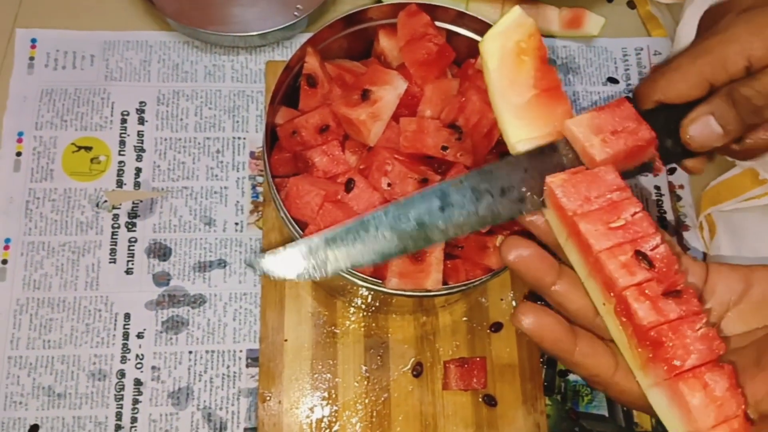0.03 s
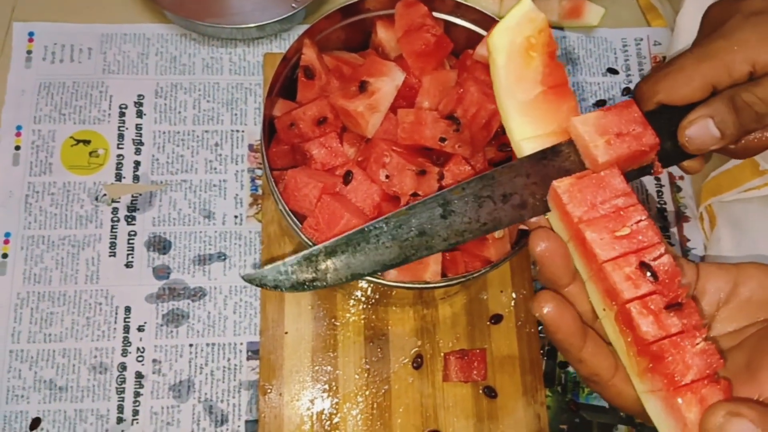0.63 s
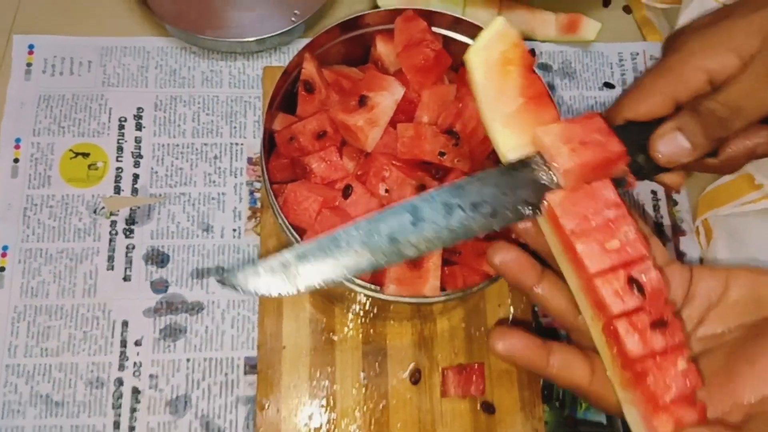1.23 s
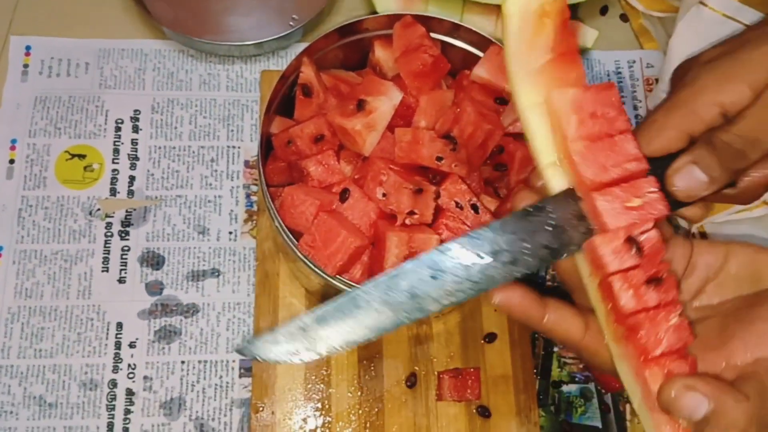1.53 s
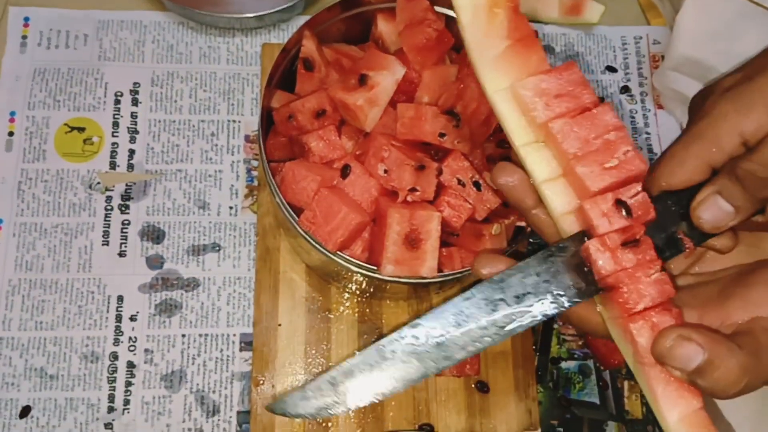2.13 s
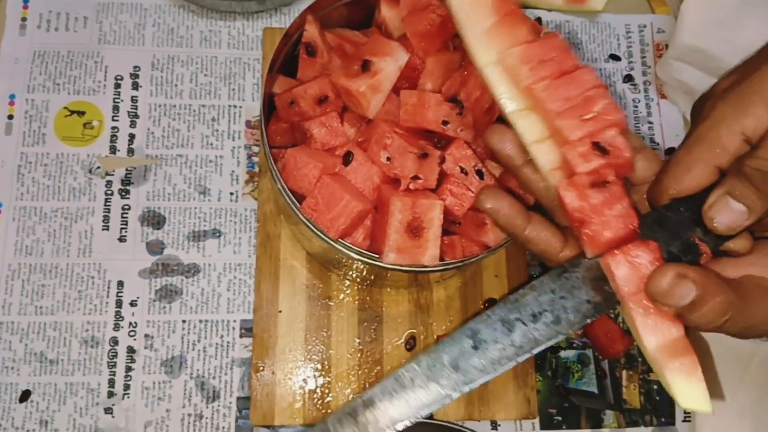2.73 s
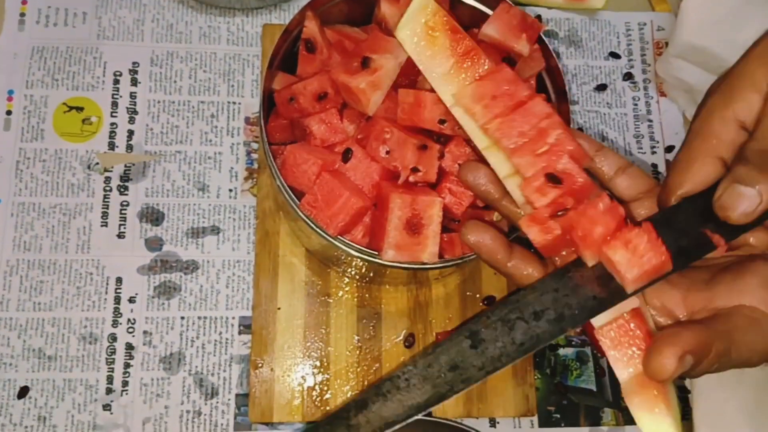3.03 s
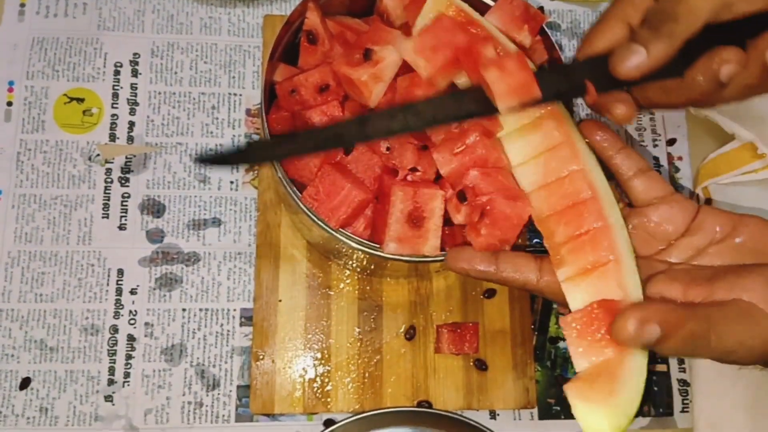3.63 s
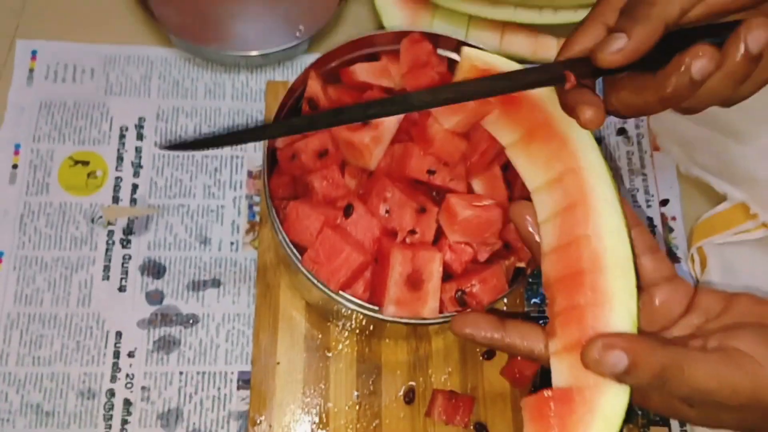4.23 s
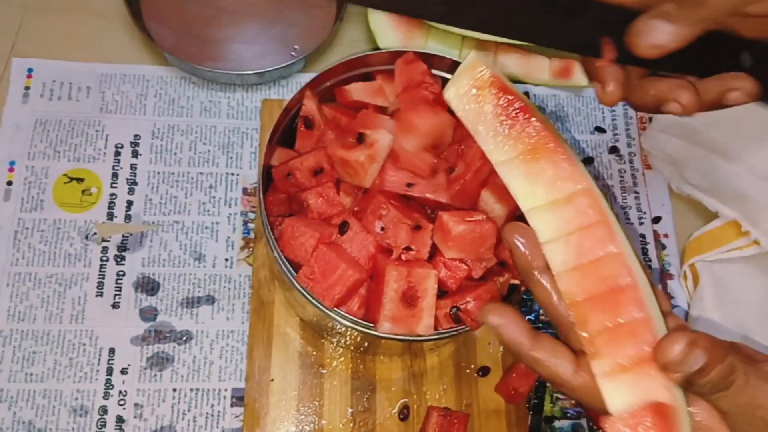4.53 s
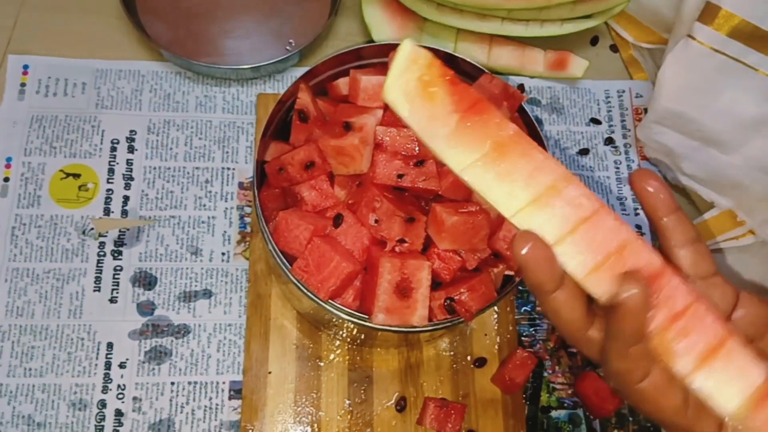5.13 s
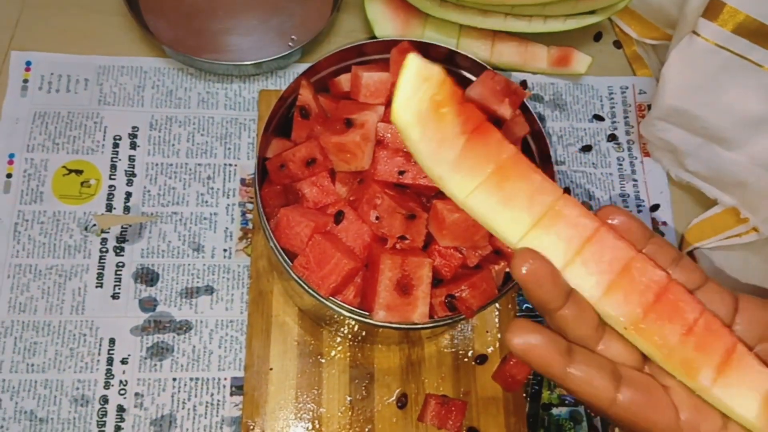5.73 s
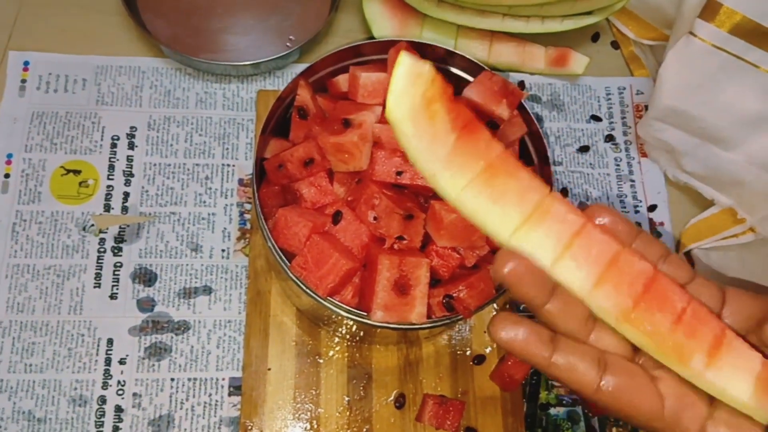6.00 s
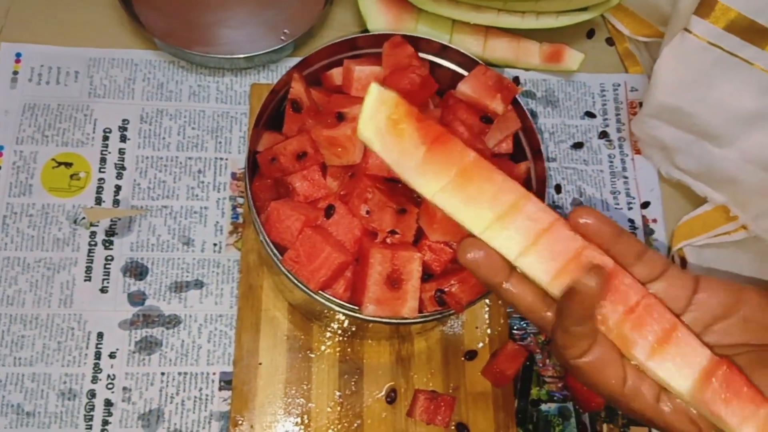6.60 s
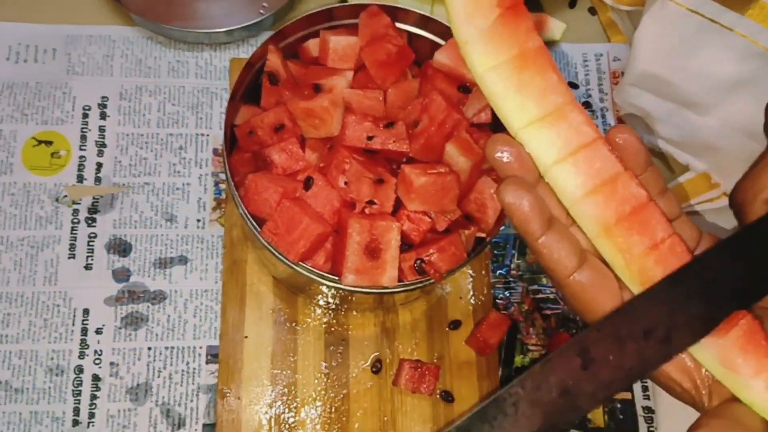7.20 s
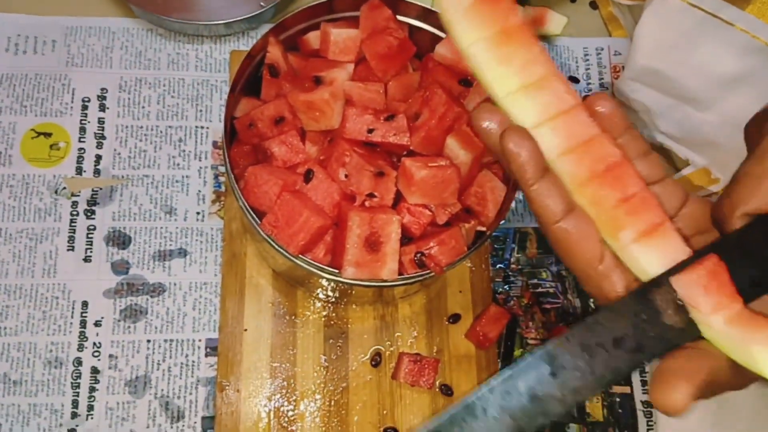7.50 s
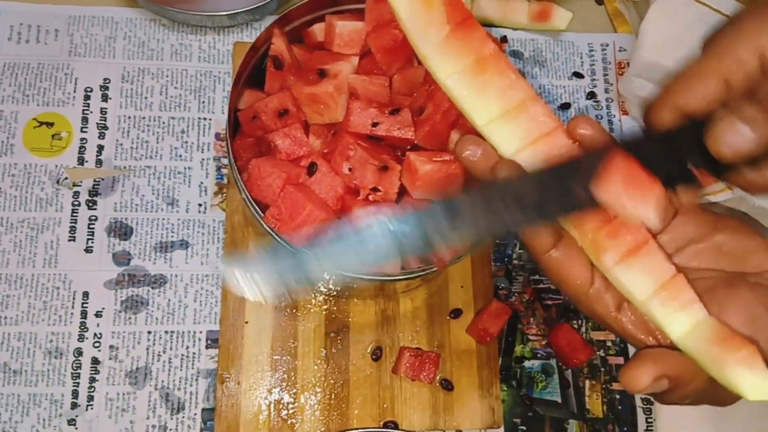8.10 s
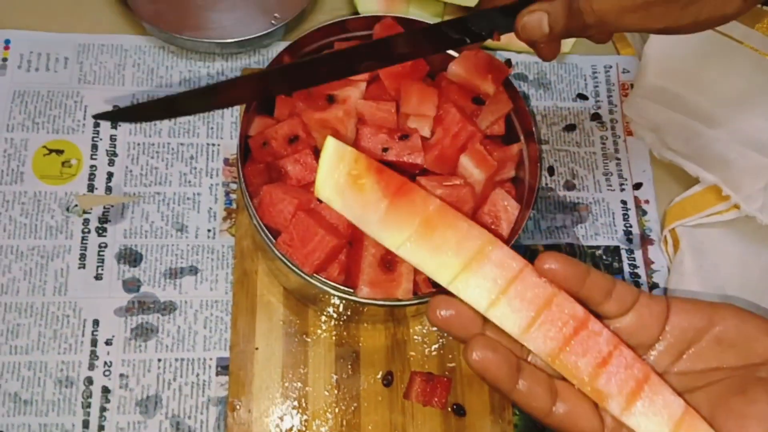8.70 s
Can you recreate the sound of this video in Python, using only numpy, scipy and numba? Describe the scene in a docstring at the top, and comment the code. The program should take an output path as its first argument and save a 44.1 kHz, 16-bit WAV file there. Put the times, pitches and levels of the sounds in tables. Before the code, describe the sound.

A large knife slices juicy watermelon off the rind in short, wet, crunchy strokes, with small pops and light taps.

```python
"""Knife cutting watermelon into a steel bowl

A large knife shaves cubes off a hand-held rind, close to a phone's left microphone port. Each stroke
bursts thousands of juicy cells: a fizz, a crunch and, deep in the cut, a hollow rasp. Wet flesh pops,
the blade rubs, taps and sings faintly, cubes drop with soft thuds. Small quiet room, electrical whine."""
import sys
import numpy as np
from scipy import signal
from scipy.fft import rfft, irfft
from scipy.io import wavfile
from scipy.ndimage import uniform_filter1d, map_coordinates
from numba import njit

SR = 44100
rng = np.random.default_rng(int(sys.argv[2]) if len(sys.argv) > 2 else 0)


def log_audio(samples):
    """Write samples as a 16-bit WAV file to the path given in sys.argv[1]."""
    # one column per channel
    frames = np.atleast_2d(samples).T
    # limit to full scale, then quantise
    limited = np.clip(frames, -1, 1)
    pcm = np.round(limited * 32767).astype(np.int16)
    wavfile.write(sys.argv[1], SR, pcm)


N = 385875
TIME = np.arange(N) / SR


# knife strokes: start_s, push_s, fizz_db, crunch_db, rasp_db, fade_db_per_s, pocket_hz, upper_pocket_db
STROKES = [(0.922, 0.24, -48, -52, -82, 230, 3700, 9.5), (1.226, 0.12, -49, -54.5, -85.5, 147.5, 3410, 3.5),
           (1.397, 0.14, -37, -36, -52, 129, 2960, -3), (1.715, 0.18, -40, -42, -58.5, 112, 2920, -11),
           (1.991, 0.15, -45, -49.5, -76, 160, 3010, -10), (2.198, 0.13, -42.5, -48.5, -68, 87, 3030, -3.5),
           (2.303, 0.13, -41, -45, -61.5, 295, 2940, -2.5),
           (2.583, 0.07, -40, -41.5, -62.5, 199, 3000, -8.5),
           (5.614, 0.077, -47.5, -66, -79, 150, 3120, 10), (5.692, 0.087, -42.5, -51, -77, 168.5, 3050, -8),
           (5.817, 0.083, -34.5, -38, -56.5, 210, 2950, -6.5),
           (7.258, 0.025, -38.5, -45, -68.5, 172, 3270, -0.5),
           (7.283, 0.13, -36, -37, -53.5, 161.5, 2980, -11)]

def slicing():
    """The edge sticks and slips through the flesh; every slip bursts more cells."""
    _, _, fizz_db, crunch_db, rasp_db, *_ = np.transpose(STROKES)
    slip = undb(0.23 * walk(size=110) + 1.6 * walk(size=400))
    fizz = juice_fizz(slip) * stroke_gain(fizz_db, swell_db=15, bend=3.5, lag_s=0.001)
    crunch = flesh_crunch(slip) * stroke_gain(crunch_db, swell_db=19.8, bend=2.63, lag_s=0.003)
    rasp = hollow_rasp(slip) * stroke_gain(rasp_db, swell_db=47, bend=4.44, lag_s=0.014)
    return undb(2) * fizz + undb(1.5) * crunch + undb(7.5) * rasp


def stroke_gain(peaks_db, swell_db, bend, lag_s):
    """The edge bites, the sound swells with depth (bend > 1: early), drops as the push ends, fades."""
    bite_db_per_s, let_go_db, let_go_s = 699.5, 7, 0.031
    db = np.full(N, -200.)
    for (start_s, push_s, _, _, _, fade_db_per_s, _, _), peak_db in zip(STROKES, peaks_db):
        age = TIME - lag_s - start_s
        depth = np.clip(age / push_s, 0, 1)
        before, after = np.maximum(-age, 0), np.maximum(age - push_s, 0)
        attack_db = bite_db_per_s * before + swell_db * (1 - depth) ** bend
        release_db = let_go_db * np.minimum(after / let_go_s, 1) + fade_db_per_s * after
        db = np.maximum(db, peak_db - attack_db - release_db)
    return undb(db)


# juice spectrum: freq_hz, gain_db
FIZZ_EQ = [(6000, -24), (8300, -20), (9200, -16.5), (9900, -6), (10600, 3), (12400, -0.5), (13600, -3.5),
           (15000, -13), (16000, -11.5)]

def juice_fizz(slip):
    """Juicy cells burst in a dense treble spray."""
    spray = cells(8700, 16500, cycles=16.8, spread_db=2, count=30000, size=40)
    return even(slip * colour(spray, FIZZ_EQ), size=1200)


# tearing flesh spectrum: freq_hz, gain_db
CRUNCH_EQ = [(1400, -18), (1850, -20), (2250, 9.5), (2600, 0.5), (3100, -3), (3900, 5), (5000, -4.5),
             (6000, -2.5), (7200, -5), (8400, -18.5), (11000, -11.5)]
# blade resonances: pitch_hz, width_hz, gain_db
BLADE_MODES = [(2402, 12, 0.5), (2430, 26, -8.5), (3086, 12, 16), (3320, 230, -7), (4620, 61, -2),
               (5120, 91, 3.5), (6000, 23, -24), (7860, 220, -10.5)]

def flesh_crunch(slip):
    """Tearing cells ring the air pockets, the wet slit beside the blade and the blade itself."""
    tearing = slip * cells(1640, 9100, cycles=13.2, spread_db=1, count=20000, size=140)
    pockets, slit = cavities(tearing)
    flesh, pockets, slit = (unit(colour(x, CRUNCH_EQ)) for x in (tearing, pockets, slit))
    blade = unit(ring(flesh, BLADE_MODES))
    return even(flesh + undb(6) * pockets + undb(-8) * slit + undb(-1.5) * blade, size=1200)


def cavities(tearing):
    """Air pockets and slit widen over each push: the sound gets lower and duller."""
    sag, dulling_db = 0.11, 14.5
    start_s, push_s, *_, pocket_hz, upper_pocket_db = np.transpose(STROKES)
    now = latest(start_s)
    opening = np.clip((TIME - start_s[now]) / push_s[now] - 1, -1, 0.3)  # -1 at push start, 0 at its end
    lower_hz = pocket_hz[now] * np.exp(-sag * opening)
    tilt_db = upper_pocket_db[now] - dulling_db * opening
    wobble = np.exp(0.036 * walk(size=2200))  # juice fills and leaves the pockets
    lower = sweep(tearing, lower_hz * wobble, width_hz=250) * undb(-tilt_db / 2)
    upper = sweep(tearing, 4950 * wobble, width_hz=600) * undb(tilt_db / 2)
    drifting_hz = lower_hz * np.exp(0.014 * walk(size=3000))
    slit_high = sweep(tearing, 1.1 * drifting_hz, width_hz=120)
    slit_low = sweep(tearing, 0.73 * drifting_hz, width_hz=120)
    return lower + upper, slit_high + undb(-12.5) * slit_low


# deep cut spectrum: freq_hz, gain_db
RASP_EQ = [(600, -58), (1050, -33.5), (1300, -16.5), (1500, -11.5), (1750, -8.5), (2000, 2), (2300, -4),
           (2900, -27)]

def hollow_rasp(slip):
    """Cells bursting deep in the cut sound low and hollow."""
    deep_cells = cells(1215, 2760, cycles=14, spread_db=-4, count=7000, size=320)
    return even(slip * colour(deep_cells, RASP_EQ), size=1200)


# snapping juice films and cell walls: start_s, fizz_db, crunch_db, length_s
POPS = [(0.026, -45, -43.5, 0.0027), (0.296, -73, -70, 0.004), (0.565, -72, -59, 0.007),
        (0.83, -58, -63, 0.009), (0.859, -54, -50, 0.0012), (0.887, -58, -62, 0.0011),
        (0.905, -50.5, -53.5, 0.00086), (0.932, -49.5, -46, 0.01), (1.029, -48, -42, 0.002),
        (1.295, -45.5, -42, 0.0083), (1.493, -35, -41, 0.002), (1.531, -41, -35, 0.0048),
        (1.7, -53, -62, 0.0036), (1.86, -40.5, -48, 0.0051), (1.966, -49, -50, 0.0089),
        (2.147, -42.5, -65, 0.0066), (2.485, -53, -51, 0.0039), (2.552, -48, -50.5, 0.012),
        (2.805, -51.5, -70.5, 0.0028), (5.395, -47.5, -61, 0.0034), (5.442, -56, -84, 0.0019),
        (5.45, -45, -60, 0.0061), (5.61, -53.5, -70, 0.0044), (5.709, -43, -52, 0.005),
        (6.057, -57, -72, 0.004), (6.086, -48.5, -58, 0.004), (6.142, -53, -58.5, 0.0021),
        (6.269, -60, -70, 0.0045), (6.414, -69, -49, 0.008), (6.533, -57, -56, 0.0057),
        (6.895, -41, -39.5, 0.015), (6.98, -53, -60, 0.0036), (7.025, -50, -62, 0.004),
        (7.039, -55, -66, 0.0016), (7.197, -49, -50, 0.0074), (7.25, -51.5, -58, 0.004),
        (7.384, -36, -28, 0.0079), (7.623, -49, -60, 0.0075), (7.671, -48, -50, 0.0052),
        (7.683, -53.5, -46, 0.0052), (7.928, -44, -45, 0.01), (8.709, -61, -49, 0.0096)]
# snap spectrum: freq_hz, gain_db
SNAP_EQ = [(1500, -37.5), (2300, 1), (3100, -3), (4200, 0.5), (5200, 3.5), (6200, -4), (7300, -14.5),
           (8600, -19.5), (11000, -31)]

def popping():
    """Wet faces part in a flurry of tiny bursts; a faint crackle just precedes and trails each snap."""
    start_s, fizz_db, crunch_db, length_s = np.transpose(POPS)
    fizz = colour(cells(11000, 15000, cycles=2.9, spread_db=9.5, count=36000, size=36), FIZZ_EQ)
    crunch = colour(cells(2500, 7700, cycles=21, spread_db=-1, count=26000, size=100), SNAP_EQ)
    snap_fizz, snap_crunch = (bursts(start_s, db, 1.24 * length_s, rise=0.4)
                              for db in (fizz_db, crunch_db))
    halo_fizz, halo_crunch = (bursts(start_s - 0.005, db - 13, length_s + 0.011, rise=1)
                              for db in (fizz_db, crunch_db))
    seep = bursts(start_s, fizz_db - 13.5, lengths_s=0.03, rise=0.12)  # juice fizzes on after a snap
    flicker = unit(undb(5.9 * walk(size=70)))
    fizz = even(fizz, size=130) * np.hypot(snap_fizz, flicker * np.hypot(halo_fizz, seep))
    crunch = even(crunch, size=130) * np.hypot(snap_crunch, flicker * halo_crunch)
    return undb(4) * fizz + undb(-8) * crunch


# blade knocks on rind, seeds and bowl: start_s, treble_db, body_db, length_s, ring_hz, ring_db
TAPS = [(2.962, -54, -69, 0.02, 2310, -52.5), (3.872, -57, -49, 0.012, 3420, -53),
        (3.942, -49.5, -42.5, 0.009, 2580, -52), (4.024, -68, -54, 0.0017, 5270, -51),
        (4.043, -49, -49, 0.006, 4440, -40.5), (4.053, -44, -48, 0.001, 2450, -42),
        (4.198, -58, -57.5, 0.011, 4740, -69), (4.305, -69.5, -72, 0.0066, 5300, -86),
        (4.533, -80, -61, .005, 3540, -62), (4.841, -72, -64, 0.0035, 5870, -59),
        (5.295, -67.5, -61, 0.0047, 4990, -66), (6.842, -74, -70.5, 0.0047, 3280, -55),
        (8.353, -86, -63, 0.003, 3490, -48)]

def tapping():
    """A sharp contact rings the damped blade and, at its own pitch, the wet spot that was struck."""
    start_s, treble_db, body_db, length_s, ring_hz, ring_db = np.transpose(TAPS)
    tick = even(colour(noise(), FIZZ_EQ), size=130)
    tick *= bursts(start_s, treble_db, 0.59 * length_s, rise=0.72)
    crack = contact_crack(start_s, body_db, length_s)
    spot = even(sweep(noise(), ring_hz[latest(start_s)], width_hz=79), size=400)
    spot *= bursts(start_s, ring_db, lengths_s=0.012, rise=0.037)
    return undb(5.5) * tick + ring(crack, BLADE_MODES) + undb(-4.5) * (crack + spot)


# hard contact spectrum: freq_hz, gain_db
CRACK_EQ = [(900, -84), (1800, 10.5), (2500, 12), (4000, 7.5), (5500, 19), (7500, 8), (9500, 9.5),
            (14000, -70)]

def contact_crack(start_s, level_db, length_s):
    """Each knock gives a broad, fast-rising burst of noise."""
    crack = even(colour(noise(), CRACK_EQ), size=130)
    return crack * bursts(start_s, level_db, 1.02 * length_s, rise=0.16)


# blade and fingers on the rind: start_s, length_s, fizz_db, crunch_db
RUBS = [(0.0, 0.011, -56, -57), (0.803, 0.11, -63, -66), (2.845, 0.035, -63, -74),
        (3.022, 0.079, -70.5, -80), (3.18, 0.16, -62.5, -77), (3.417, 0.067, -69.5, -74.5),
        (3.517, 0.069, -63, -64), (3.63, 0.084, -79.5, -80), (3.892, 0.24, -65, -69.5),
        (4.114, 0.16, -70.5, -75), (4.432, 0.15, -77.5, -91), (4.681, 0.053, -70, -73.5),
        (6.065, 0.057, -61, -73), (6.384, 0.18, -71, -68), (6.956, 0.039, -53.5, -69.5),
        (7.632, 0.034, -49.5, -65), (8.691, 0.04, -59.5, -70)]

def rubbing():
    """Light contact on wet rind: small crackles, random tiny snaps and the blade's thin top ring."""
    snaps_per_s, snap_db, snap_spread_db = 50, -6, 9
    fizz = even(colour(cells(8000, 17000, cycles=3.3, spread_db=1, count=6000, size=48), FIZZ_EQ), 2000)
    crunch = even(cells(2800, 6480, cycles=17, spread_db=-6, count=7000, size=140), size=2000)
    snaps = rng.random(N) < snaps_per_s / SR
    levels_db = snap_db + snap_spread_db * rng.uniform(-1, 1, N)[snaps]
    fizz *= np.hypot(1, bursts(TIME[snaps], levels_db, lengths_s=0.006, rise=0.43))
    fizz += undb(-7.5) * unit(ring(fizz, [(10400, 100, 0)]))
    out = 0
    for start_s, length_s, fizz_db, crunch_db in RUBS:
        contact = hold(start_s, length_s, attack_s=0.018, release_s=0.009)
        out += contact * (undb(fizz_db) * fizz + undb(crunch_db) * crunch)
    return out


# blade drags: start_s, length_s, level_db, pitch_hz, width_hz, rustle_rel_db
DRAGS = [(2.977, 0.515, -71, 2675, 70, -26), (3.557, 0.62, -73, 2700, 70, -29),
         (6.298, 0.32, -79, 2670, 300, -16), (3.506, 0.11, -75, 4750, 450, -9),
         (3.964, 0.21, -71, 4780, 440, -12), (6.34, 0.28, -70.5, 4790, 300, -13)]

def singing():
    """Friction on the wet rind keeps a narrow resonance faintly, unevenly alive in a broader rustle."""
    rustle = unit(ring(colour(noise(), SNAP_EQ), [(5070, 1500, -2), (3000, 430, -1)]))
    friction, out = noise(), 0
    for start_s, length_s, level_db, pitch_hz, width_hz, rustle_rel_db in DRAGS:
        mode = [(pitch_hz, width_hz, 0)]
        tone = even(ring(ring(friction, mode), mode), size=3000)
        contact = hold(start_s, length_s, attack_s=0.042, release_s=0.051)
        out += undb(level_db) * contact * (undb(3.5) * tone + undb(rustle_rel_db) * rustle)
    flutter_db = walk(size=1500)
    return out * undb(flutter_db)


# soft impacts of flesh and hands: start_s, level_db, length_s, pitch_hz, bowl_rel_db
THUDS = [(0.716, -63.5, 0.025, 128, -11), (0.85, -63.5, 0.07, 65, -27), (0.923, -71, 0.059, 65, -2.5),
         (1.12, -65, 0.043, 70, -31), (1.223, -63.5, 0.065, 65, -16), (2.781, -69, 0.02, 103.5, -33.5),
         (3.414, -58.5, 0.023, 125.4, -23), (5.141, -65, 0.055, 78.7, -11), (5.26, -60.5, 0.021, 74.3, -15),
         (7.29, -63.5, 0.03, 139, -23), (7.762, -54, 0.023, 117, -20), (7.788, -51, 0.016, 69.4, -9),
         (7.818, -52.5, 0.033, 112, -26)]
# full bowl resonances: pitch_hz, width_hz, gain_db
BOWL_MODES = [(396, 360, -1), (780, 140, 2.5), (1223, 130, -4), (1570, 400, -3.5)]

def thudding():
    """Soft low thuds shake the board, each with its own pitch and its own amount of bowl knock."""
    start_s, level_db, length_s, pitch_hz, bowl_rel_db = np.transpose(THUDS)
    energy_db = level_db + 10 * np.log10(length_s / 0.01)
    board_hz = np.interp(TIME, start_s + length_s / 2, pitch_hz)
    board = even(sweep(sweep(noise(), board_hz, width_hz=44), board_hz, width_hz=44), size=900)
    board *= bursts(start_s, energy_db, 0.86 * length_s, rise=0.84)
    bowl = even(ring(ring(noise(), BOWL_MODES), BOWL_MODES), size=700)
    bowl *= bursts(start_s, energy_db + bowl_rel_db, 1.7 * length_s, rise=0.25)
    return board + bowl


# shading of the far port: freq_hz, gain_db
FAR_PORT_EQ = [(100, -3), (1000, 3.5), (2200, -1), (3500, 0), (5000, -1.5), (7000, 2.5), (8500, 8.5),
               (9400, -3.5), (10600, -19.5), (12500, -9.5), (14000, -13), (16000, -22)]

def ports(x):
    """The near port hears mostly the blade itself, the shaded far port more of the room."""
    near = x + undb(-9.5) * reflections(x)
    lag_samples = 2 + 5.2 * walk(size=500)  # cells burst all along the blade
    shaded = map_coordinates(x, [np.arange(N) - lag_samples], order=3)
    detour_samples = 70 + 22 * walk(size=900)  # by way of board, bowl and hands
    scattered = map_coordinates(x, [np.arange(N) - detour_samples], order=3)
    far = undb(-14) * shaded + undb(-6.5) * (scattered + reflections(x))
    return np.array([near, colour(far, FAR_PORT_EQ)])


def reflections(x, t60_s=0.17):
    """Dense, quickly dying echoes of a small room."""
    age = TIME[:SR // 2]
    tail = rng.standard_normal(len(age)) * undb(-60 * age / t60_s) * (1 - np.exp(-age / 0.001))
    return signal.fftconvolve(x, tail / np.linalg.norm(tail))[:N]


# room air spectrum: freq_hz, gain_db
AIR_EQ = [(20, -23), (40, -18.5), (62, -4.5), (90, -6), (135, 3.5), (200, -9), (290, -4), (600, -13.5),
          (900, -13), (1400, -17), (2800, -17.5), (4500, -31.5), (8000, -39), (16000, -35.5)]

def room_air():
    """Faint rumble and hiss, mostly alike at both ports from 70 to 500 Hz."""
    side_eq = [(30, 5.5), (70, -11), (130, -8.5), (250, -7.5), (500, -7.5), (1000, 1.5), (4000, 1)]
    mid = colour(noise(), AIR_EQ)
    side = colour(colour(noise(), AIR_EQ), side_eq)
    return np.array([mid + side, mid - side]) / np.std(mid) * undb(-70.5 + 0.22 * walk(size=9000))


def electrical_whine(pitch_hz=3807):
    """A thin, slightly wavering tone, louder at the far port."""
    phase = 2 * np.pi * np.cumsum(pitch_hz + walk(size=3000)) / SR
    near_db, far_db = -83 + 4 * walk(size=20000), -75 + 1.2 * walk(size=6000)
    return np.sqrt(2) * np.sin(phase) * undb([near_db, far_db])


def cells(low_hz, high_hz, cycles, spread_db, count, size):
    """Random bursting cells, each dying 60 dB over `cycles`; spread_db > 0 makes a few much louder."""
    when, pitch, luck = rng.random((count, 3)).T
    hz = (low_hz + pitch * (high_hz - low_hz))[:, None]
    turns = hz * np.arange(size) / SR
    strength = undb(-spread_db * np.log(np.maximum(luck, 0.01)))[:, None] * hz
    grains = strength * np.sin(2 * np.pi * turns) * undb(-60 * turns / cycles)
    places = (when * N).astype(int)[:, None] + np.arange(size)
    return np.bincount(places.ravel(), grains.ravel(), N + size)[:N]


def bursts(starts_s, levels_db, lengths_s, rise):
    """Envelope of quick swells that die away; a level is the burst's energy spread over 10 ms."""
    power = np.zeros(N)
    for start_s, db, length_s in np.broadcast(starts_s, levels_db, np.maximum(lengths_s, 0.001)):
        first = int(start_s * SR)
        age = np.arange(min(int(10 * length_s * SR), N - first)) / SR / length_s
        shape = (1 - np.exp(-age / rise)) ** 2 * np.exp(-2 * age)
        power[first:first + len(age)] += undb(db) ** 2 * shape / (shape.sum() + 1e-9) * SR / 100
    return np.sqrt(power)


def hold(start_s, length_s, attack_s, release_s):
    """Envelope that rises, holds through a contact and dies away."""
    age = TIME - start_s
    return np.clip(age / attack_s, 0, 1) * np.exp(-np.clip((age - length_s) / release_s, 0, 20))


def latest(starts_s):
    """Index of the most recent event at each sample."""
    return np.maximum(np.searchsorted(starts_s, TIME) - 1, 0)


def colour(x, points):
    """Minimum-phase filter through (freq_hz, gain_db) points."""
    hz, db = np.transpose(points)
    grid_hz = np.maximum(np.fft.rfftfreq(4096, 1 / SR), 1)
    cepstrum = irfft(np.log(undb(np.interp(np.log(grid_hz), np.log(hz), db))))
    half = len(cepstrum) // 2
    cepstrum[1:half] *= 2
    cepstrum[half + 1:] = 0
    return signal.fftconvolve(x, irfft(np.exp(rfft(cepstrum))))[:N]


def ring(x, modes):
    """Drive parallel (pitch_hz, width_hz, gain_db) resonances."""
    return sum(undb(db) * signal.lfilter(*signal.iirpeak(hz, hz / width_hz, fs=SR), x)
               for hz, width_hz, db in modes)


@njit
def sweep(x, hz, width_hz):
    """Resonance with a moving centre, gain 1 there."""
    y, band, low = np.empty(len(x)), 0., 0.
    for i in range(len(x)):
        g, damping = np.tan(np.pi * hz[i] / SR), width_hz / hz[i]
        v = (band + g * (x[i] - low)) / (1 + g * (g + damping))
        band, low = 2 * v - band, low + 2 * g * v
        y[i] = damping * v
    return y


def noise():
    """White noise."""
    return rng.standard_normal(N)


def walk(size):
    """Random levels held for size samples and slewed; rms 1."""
    steps = np.repeat(rng.standard_normal(N // size + 1), size)
    return unit(uniform_filter1d(steps, size)[:N])


def even(x, size):
    """Hold the rms at 1 over windows of size samples."""
    return x / np.sqrt(np.abs(uniform_filter1d(x ** 2, size)) + 1e-9)


def unit(x):
    """Scale to rms 1."""
    return x / np.sqrt(np.mean(x ** 2))


def undb(db):
    """Decibels to gain."""
    return 10 ** (np.asarray(db) / 20)


def scene():
    """Knife work close by, thuds through the board, the room behind."""
    knife = slicing() + rubbing() + popping() + tapping() + singing()
    return ports(knife) + thudding() + room_air() + electrical_whine()


def record(dry):
    """Steep low-pass at 15.9 kHz."""
    return signal.sosfilt(signal.ellip(10, 0.2, 70, 15900, fs=SR, output="sos"), dry)


dry = scene()
out = record(dry)
log_audio(out)
```